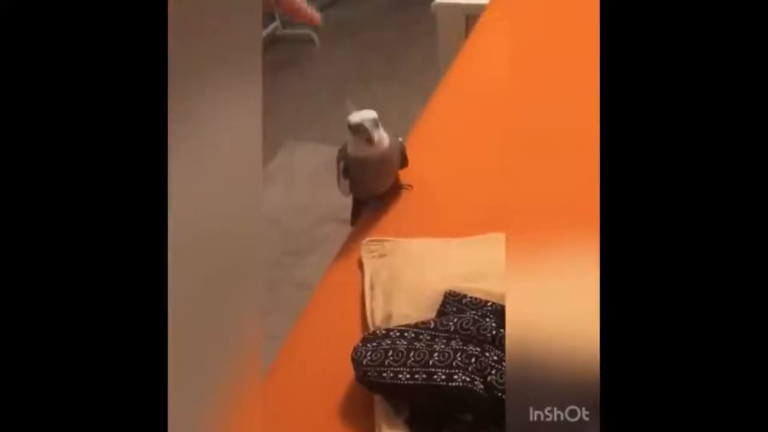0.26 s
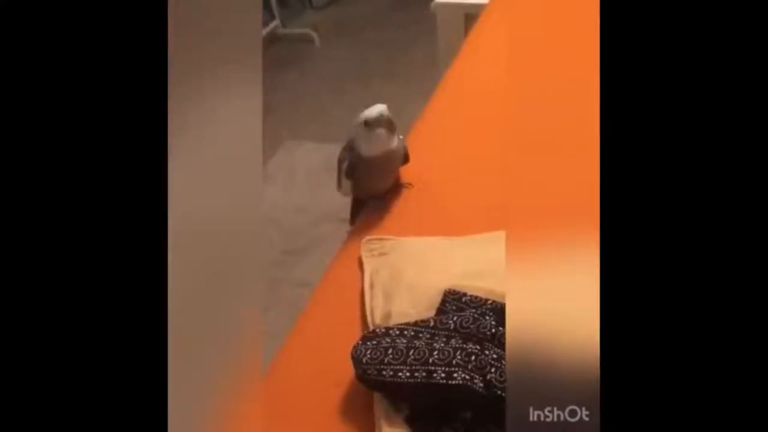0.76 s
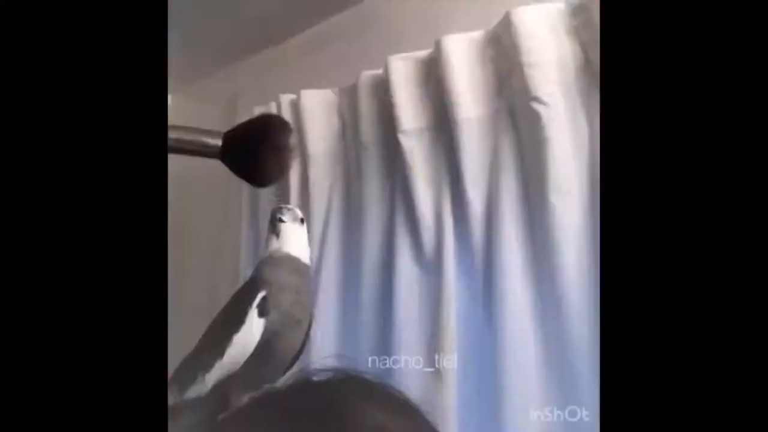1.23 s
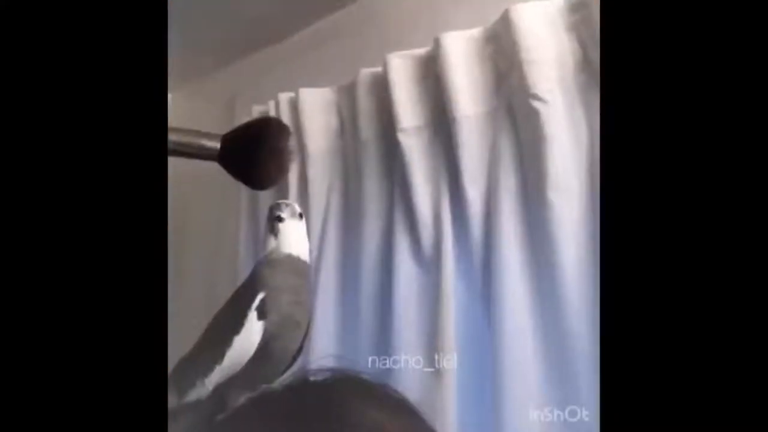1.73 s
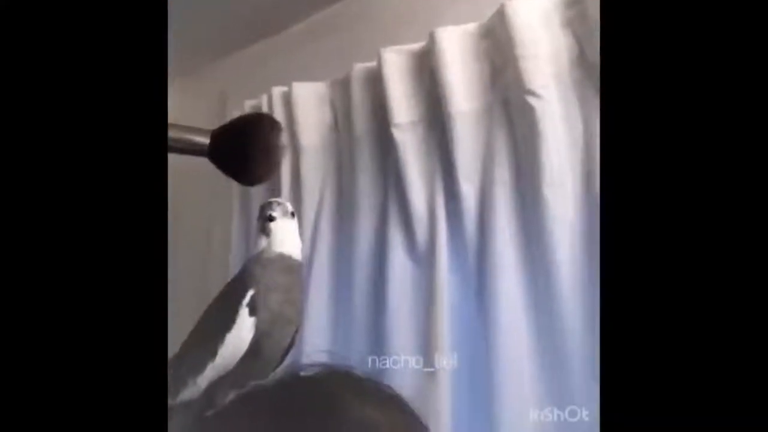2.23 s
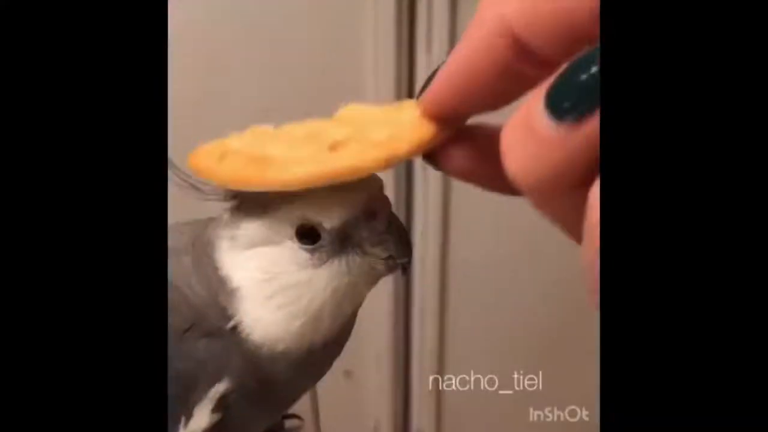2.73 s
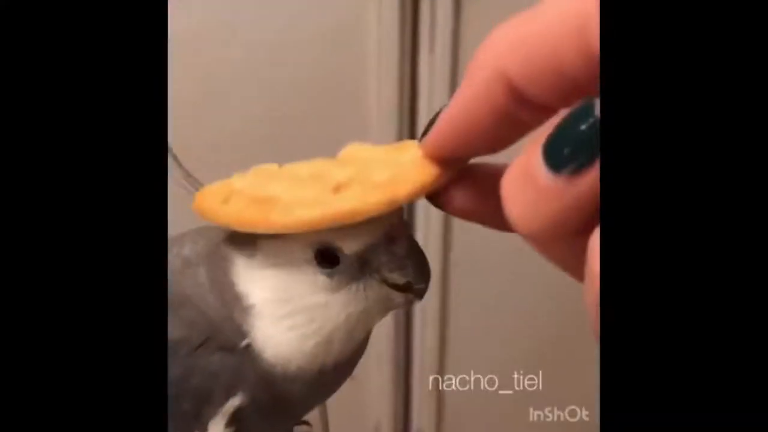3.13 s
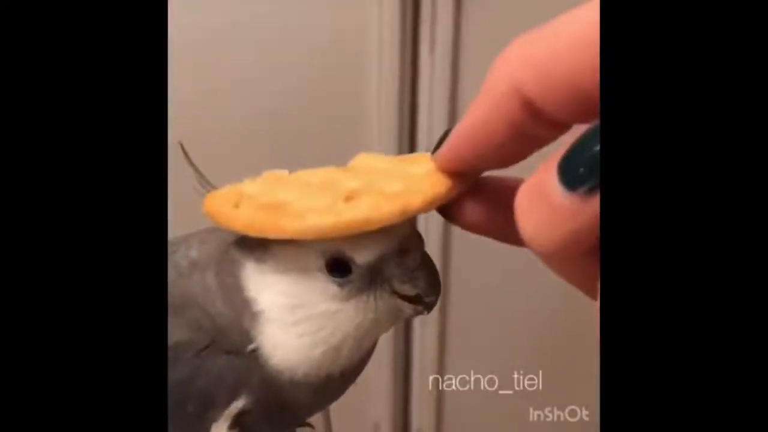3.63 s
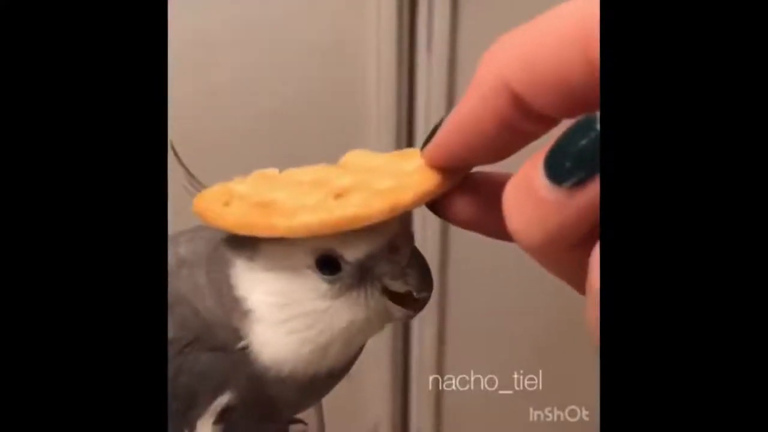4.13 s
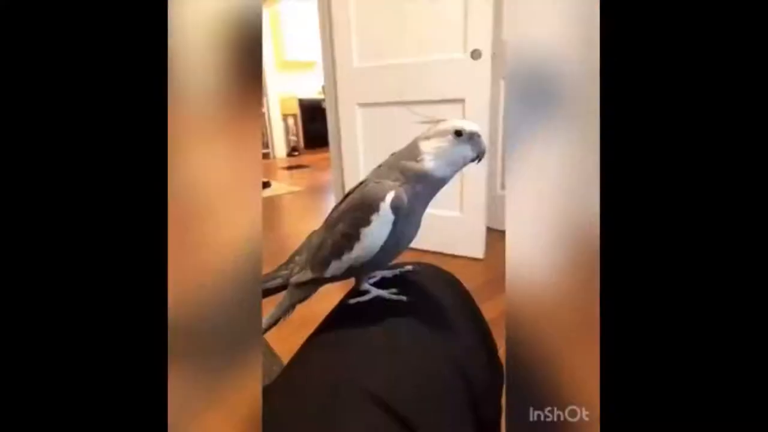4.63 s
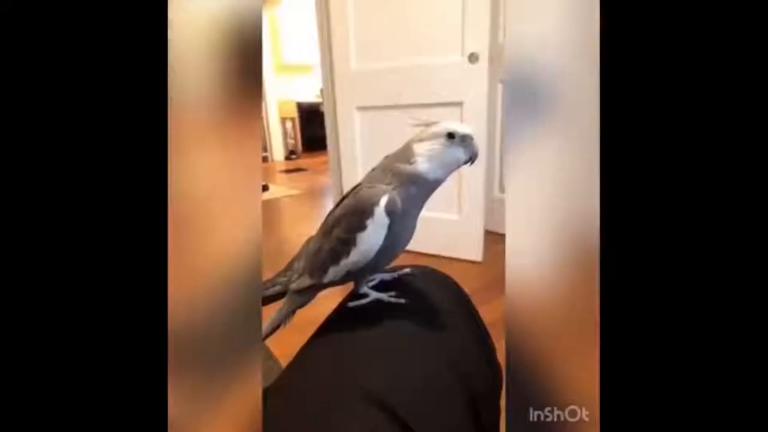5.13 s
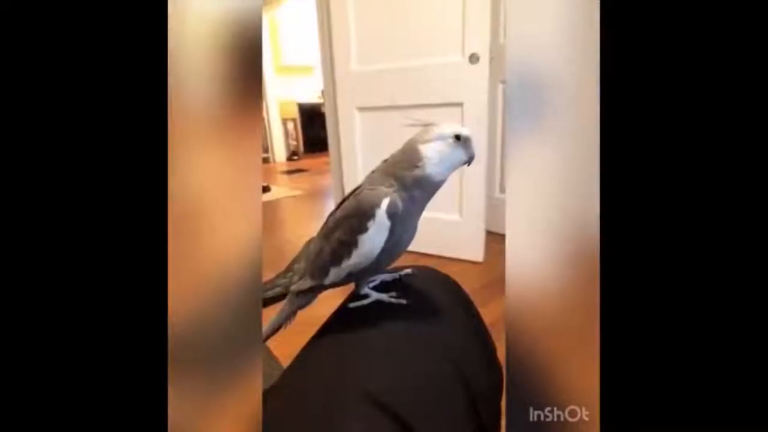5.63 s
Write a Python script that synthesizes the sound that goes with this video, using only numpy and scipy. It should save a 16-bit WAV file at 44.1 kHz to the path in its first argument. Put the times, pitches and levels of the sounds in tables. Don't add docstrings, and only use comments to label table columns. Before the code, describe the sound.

Three shrill fast-warbling cockatiel calls over changing room hum, with abrupt cuts between, ending in near-silence with soft far-off rubs and knocks.

```python
import sys
import numpy as np
from scipy import signal
from scipy.fft import rfft, irfft, next_fast_len
from scipy.io import wavfile
from scipy.ndimage import uniform_filter1d, minimum_filter1d, map_coordinates

SR = 44100
rng = np.random.default_rng(int(sys.argv[2]) if len(sys.argv) > 2 else 0)


def makeup_ratio(level_db):
    decades = np.asarray(level_db, float) / 20
    return 10 ** decades


def generate_wav(signal):
    frames = np.transpose(np.atleast_2d(signal))
    scaled = np.clip(frames, -1, 1) * 32767
    pcm = np.round(scaled).astype(np.int16)
    wavfile.write(sys.argv[1], SR, pcm)


N = 258867

# (time [s], sag pitch [Hz], next crest pitch [Hz], crest level [dB],
# beak opening [dB], hoarseness [dB])
FIRST_CALL = [
    (-0.026, 1870, 2050, -19, 10, -45),
    (0.01, 1792, 2083, -17, -2, -44),
    (0.082, 1803, 2070, -17.5, -2.5, -40.5),
    (0.197, 1755, 2049, -16.5, -2, -39),
    (0.311, 1774, 2040, -19, 4.5, -48.5),
    (0.466, 1748, 1995, -20.5, 1, -47),
    (0.659, 1744, 2012, -19, 1, -40),
    (0.696, 1732, 1917, -20, 1.5, -36),
    (0.724, 1782, 1637, -33, 6.5, -14),
]
SECOND_CALL = [
    (1.495, 1305, 1264, -32, -12.5, -27.5),
    (1.519, 1334, 1640, -20, -26, -21.5),
    (1.549, 1537, 1886, -12.5, -5.5, -20.5),
    (1.652, 1799, 2115, -11, -0.5, -48.5),
    (2.071, 1901, 2168, -12, 7.5, -64),
    (2.144, 1920, 2166, -13.5, 7.5, -60.5),
    (2.221, 1890, 2083, -11, 2, -50),
    (2.253, 1880, 1887, -11, 1, -39),
    (2.292, 1780, 1868, -24.5, -3, -16.5),
]
THIRD_CALL = [
    (2.854, 1221, 1527, -15.5, -30, -25.5),
    (2.917, 1626, 1962, -7.5, -7.5, -26.5),
    (2.986, 1818, 2109, -8, 0, -25.5),
    (3.124, 1875, 2140, -6, 1.5, -55.5),
    (3.594, 1886, 2165, -8, 2.5, -52.5),
    (4.014, 1821, 2115, -9.5, 3, -44.5),
    (4.056, 1802, 2054, -11, 1.1, -44),
    (4.098, 1790, 1859, -11.5, 0.5, -34.5),
    (4.137, 1531, 1525, -21, 1, -15.5),
]
THROBS_PASSED = [
    [0, 1, 3, 6, 9, 13, 18, 19, 20],
    [0, 1, 3, 6, 18, 20, 22, 23, 24],
    [0, 2, 4, 8, 21, 32, 33, 34, 35],
]
# (time [s], pitch [Hz], level [dB])
CALL_ENDS = [
    (.749, 1500, -47),
    (2.32, 1740, -58),
    (4.156, 1370, -25),
]
# (time [s], hoarseness [dB])
CRACKS = [(.272, -35.5), (.311, -38), (.428, -37), (.619, -32), (.658, -38.5), (1.617, -30.5),
          (1.652, -35.5), (1.69, -38.5), (1.76, -42), (1.896, -34), (1.934, -39), (2.07, -31.5),
          (2.108, -44), (2.143, -30), (3.02, -22.5), (3.338, -31), (3.484, -32), (3.592, -34.5),
          (4.058, -31.5)]


def throbs(k):
    points = (FIRST_CALL, SECOND_CALL, THIRD_CALL)[k]
    passed = THROBS_PASSED[k]
    count = np.arange(passed[-1] + 1)
    rows = np.array([np.interp(count, passed, column) for column in np.transpose(points)]).T
    scatter_hz, scatter_db, end_hoarse_db = 16, 0.06, -20
    scatter = [0, scatter_hz, scatter_hz, scatter_db, scatter_db, 0]
    rows = rows + rng.standard_normal(rows.shape) * scatter
    for s, hoarse_db in CRACKS:
        rows[np.abs(rows[:, 0] - s) < .012, 5] = hoarse_db
    s, hz, db = CALL_ENDS[k]
    return np.vstack([rows, [s, hz, hz, db, rows[-1, 4], end_hoarse_db]])


# (frequency [Hz], level [dB])
BEAKS = [
    [(1300, -16), (2050, -4.5), (3000, -10), (4100, -2), (5300, -9.5), (6200, -8), (7600, -24.5),
     (8200, -12.5), (10300, -31), (12300, -12.5), (14000, -29)],
    [(1300, -2.5), (2100, -11), (2700, -10.5), (4200, -5.5), (5300, -4.5), (6400, -13.5), (7900, -21.5),
     (8500, -19.5), (10500, -32), (12600, -18), (14000, -31)],
    [(1300, -7.5), (2100, -5.5), (2700, -9), (4200, -5.5), (5300, -3), (6400, -3), (8500, -10.5),
     (10600, -21), (12700, -10), (14000, -22)],
]
TRILLS = [(1.6, 0.94), (1.75, 0.94), (1.15, 1.048)]
# (strength [dB], fading in a full sag [dB])
OVERTONES = [(0.5, 8.5), (-0.5, 21.5), (1.5, 16), (0.5, 15), (-1.5, 32), (-3, 28), (-2.5, 31), (-7.5, 32),
             (-16.5, 31.5)]


def call(k):
    s, low, crest, db, opening, hoarse_db = np.transpose(throbs(k))
    beak = BEAKS[k]
    narrow, fading = TRILLS[k]
    t = np.arange(N) / SR
    place = np.interp(t, s, np.arange(len(s)))
    row = np.minimum(place.astype(int), len(s) - 2)
    climb = np.clip((low[row + 1] - low[row]) / 200, 0, 1)
    late = .88 + .12 * climb
    arch = np.abs(np.sin(np.pi * np.clip(place - row, 0, 1) ** late))
    middle = np.append((s[1:] + s[:-1]) / 2, s[-1])

    depth = (crest + np.append(crest[0], crest[:-1])) / 2 - low
    fullness = np.clip(np.interp(t, s, depth) / 270 + 0.69 * climb, .1, 1.4)
    dropout = 0.52 / (1 + np.exp((arch - .56) / 0.065))
    sag = fullness * (0.32 * (1 - arch) + dropout)
    hoarse = makeup_ratio(np.clip(np.interp(t, s, hoarse_db), -66, -16)) * (1 - arch) ** 1.1

    rise = crest[row] - (low[row] + low[row + 1]) / 2
    jitter = 1 + 0.0012 * wobble(150) + 0.14 * np.sqrt(hoarse) * wobble(600)
    pitch = (np.interp(t, s, low) + rise * arch ** narrow) * jitter
    turn = 2 * np.pi * np.cumsum(pitch) / SR
    half_pitch = 0.41 * np.cos(turn / 2) + np.cos(3 * turn / 2)
    voice = makeup_ratio(1.5) * hoarse * half_pitch

    effort_db = np.interp(t, middle, db)
    thin_db = 0.41 * (effort_db - db.max()) * (t < s.mean())
    for n, (strength_db, fade_db) in enumerate(OVERTONES, start=1):
        colour = along(beak, n * pitch) + strength_db - fade_db * fading * sag
        colour += (n - 1) ** 0.41 * thin_db
        if n in (3, 5, 7):
            colour += np.interp(t, middle, opening)
        lag = .2 * (n - 3) ** 2
        level = makeup_ratio(colour + (1.0 + 0.26 * n) * wobble(70))
        voice += level * np.cos(n * turn - lag) * (n * pitch < 14500)

    air = breath(beak)
    voice += makeup_ratio(2.0) * hoarse * air
    gate = np.clip(np.minimum(t - s[0], s[-1] - t) / 0.0034, 0, 1)
    rasp = makeup_ratio(rasp_level(k, s[-1]) + 3.6 * wobble(250)) * air
    rasp *= (t > s[0]) * (t < s[-1] + .06)
    return np.sqrt(2) * makeup_ratio(effort_db) * gate * voice + rasp


def breath(beak):
    def throat(hz):
        return makeup_ratio(along(beak, hz) * 0.47) / (1 + (1100 / (hz + 1)) ** 4) / (1 + (hz / 9800) ** 6)
    return unit(filtered(rng.standard_normal(N), throat))


RASP_DB = [-49, -65, -40.5]
# (time [s], peak [dB], rise [dB/s], fall [dB/s])
FLARES = [
    (0.741, -34, 279.5, 798),
    (1.65, -40.5, 71.5, 401.5),
    (2.282, -28, 902.5, 765),
    (2.92, -21.5, 356.5, 251),
    (4.142, -18.5, 423, 944),
]


def rasp_level(k, end_s):
    t = np.arange(N) / SR
    levels = [np.where(t < end_s, RASP_DB[k], -120)]
    for s, db, rise, fall in FLARES:
        levels.append(db - np.where(t < s, rise * (s - t), fall * (t - s)))
    return np.max(levels, axis=0)


# (level [dB], near walls [dB], t60 at 2 kHz [s], t60 at 10 kHz [s])
ROOMS = [(-9, 8.5, 0.41, 0.31), (-6, 14.5, 0.29, .25), (-19.5, 1, 0.69, 0.18)]


def room(x, k):
    db, near_db, low_t60, high_t60 = ROOMS[k]
    hz, t, z = signal.stft(rng.standard_normal(SR // 2), SR, nperseg=256)
    t60 = along([(2000, low_t60), (10000, high_t60)], hz)[:, None]
    decay = makeup_ratio(-60 * t / t60) + makeup_ratio(near_db - 60 * t / 0.06)
    tail = signal.istft(z * decay, SR, nperseg=256)[1]
    answer = signal.fftconvolve(np.pad(x, (180, 0)), tail / np.linalg.norm(tail))[:N]
    return x + makeup_ratio(db) * answer


# (time [s], length [s], level at first [dB], level at last [dB])
SCUFFS = [
    (4.419, .01, -66, -76),
    (4.525, .008, -76, -74),
    (4.575, .18, -66.5, -71),
    (4.795, 0.18, -68.5, -68.5),
    (4.988, .062, -78, -67),
    (5.387, 0.16, -73.5, -75),
    (5.674, 0.16, -60.5, -74.5),
    (5.84, .04, -71, -75),
]


def scuff_level():
    t = np.arange(N) / SR
    still_db, edge_db_per_s = -84, 900
    levels = [np.full(N, still_db)]
    for s, length, first, last in SCUFFS:
        outside = np.maximum(0, np.maximum(s - t, t - s - length))
        levels.append(np.interp(t, [s, s + length], [first, last]) - edge_db_per_s * outside)
    return np.max(levels, axis=0)


# (frequency [Hz], width [Hz], level [dB])
FURNITURE = [(772.7, 49, -10.5), (1247, 35, -5), (1955, 210, -20.5), (2310, 44, -16), (3180, 420, -25.5),
             (4500, 160, -20), (6526, 1600, -29.5)]


def scuffs():
    def wood(f):
        ring = 0
        for k, (c, w, db) in enumerate(FURNITURE):
            ring = ring + (-1) ** k * makeup_ratio(db) * 1j * f * w / (c * c - f * f + 1j * f * w)
        return ring
    rub = rng.standard_normal(N) * makeup_ratio(1.58 * wobble(50))
    return makeup_ratio(scuff_level() + 2.0) * unit(filtered(rub, wood))


# (frequency [Hz], density [dB per Hz])
HUMS = [
    [(15, -23), (25, -5.5), (48, 0), (82, -8), (168, 0.5), (286, -9), (326, -6), (372, -10), (584, -10),
     (868, -21), (1400, -24.5), (14000, -52)],
    [(15, -35.5), (25, -21.5), (91, -0.5), (187, -14.5), (271, -5), (344, -17.5), (868, -24), (1230, -30.5),
     (1600, -33.5), (2030, -43.5), (2710, -35), (14000, -64.5)],
    [(15, -54), (25, -27), (48, -6.5), (87, -10.5), (129, -4), (187, -9.5), (225, 2.5), (264, -4),
     (569, -12.5), (684, -11.5), (916, -3.5), (1100, -11), (1260, -6.5), (1600, -17), (14000, -52)],
    [(15, -67), (25, -35), (65, -15), (96, -5), (173, -12), (244, 0), (392, -19.5), (485, -15.5),
     (554, -27), (722, -29.5), (1070, -36), (2500, -42.5), (4480, -46), (4990, -46), (14000, -55)],
]
# (start [dB], middle [dB], end [dB], swell after opening cut [dB], before closing cut [dB])
HUM_DB = [(-51.5, -51, -49.5, 7, 2.5), (-54, -57, -55, 0.5, 2), (-35.5, -38.5, -36, 0.89, -2),
          (-51.5, -52, -51, 0.5, 1)]


def hum(k):
    start, end = CUTS[k], CUTS[k + 1]
    start_db, middle_db, end_db, opening_db, closing_db = HUM_DB[k]
    swell_s = .035
    air = filtered(rng.standard_normal(N), lambda hz: makeup_ratio(along(HUMS[k], hz)))
    t = np.clip(np.arange(N) / SR, start, end)
    swell_db = opening_db * np.exp((start - t) / swell_s) + closing_db * np.exp((t - end) / swell_s)
    level_db = np.interp(t, [start, (start + end) / 2, end], [start_db, middle_db, end_db])
    return makeup_ratio(level_db + swell_db + 2.0 + 0.98 * wobble(4.6)) * unit(air)


CUTS = [0, 1.246, 2.562, 4.412, 5.88]


def take(k):
    t = np.arange(N) / SR
    return np.clip(np.minimum(t - CUTS[k] + (k == 0), CUTS[k + 1] - t) / 0.00078, 0, 1)


def unit(x):
    return x / np.sqrt(np.mean(x ** 2) + 1e-20)


def along(points, hz):
    f, v = np.transpose(points)
    return np.interp(np.log(hz + 1), np.log(f + 1), v)


def wobble(rate):
    return map_coordinates(rng.standard_normal(int(N * rate / SR) + 4), [np.arange(N) * rate / SR])


def filtered(x, response):
    m = next_fast_len(N + SR // 2)
    return irfft(rfft(x, m) * response(np.fft.rfftfreq(m, 1 / SR)), m)[:N]


def scene():
    sources = [room(call(k), k) for k in range(3)] + [scuffs()]
    return sum(take(k) * (sources[k] + hum(k)) for k in range(4))[None]


def masked(x):
    mask_db = [(2500, -35), (5000, -35.0), (9500, -27), (10600, -31.5), (11500, -26.5), (13000, -34.0)]
    grain_db = [(2000, -30.5), (6000, -16.5), (10000, -7.5), (14000, -6.5)]
    hz, _, z = signal.stft(x, SR, nperseg=1024)
    band = uniform_filter1d(uniform_filter1d(np.abs(z) ** 2, size=9, axis=0), size=3, axis=1)
    loudest = -minimum_filter1d(-band, size=81, axis=0)
    grain = signal.stft(rng.standard_normal(N), SR, nperseg=1024)[2]
    grain = grain / np.abs(grain).mean()
    floor = np.sqrt(np.abs(minimum_filter1d(band, size=3, axis=1)))
    z = z + makeup_ratio(along(grain_db, hz))[:, None] * floor * grain
    kept = (band > loudest * makeup_ratio(2 * along(mask_db, hz))[:, None]) | (hz[:, None] < 1400)
    return signal.istft(z * kept, SR, nperseg=1024)[1][:N]


def low_pass(x):
    return signal.sosfilt(signal.butter(12, 14480, fs=SR, output="sos"), x)


def record(dry):
    top, hard, ceiling = 1.03, 4, .995
    x = dry[0] / (1 + np.abs(dry[0] / top) ** hard) ** (1 / hard)
    x = masked(x)
    x = filtered(x, lambda hz: np.clip((14200 - hz) / 600, 0, 1))
    needed = ceiling / np.maximum(np.abs(x), ceiling)
    x = x * uniform_filter1d(minimum_filter1d(needed, size=128), size=128)
    return low_pass(x[None])


dry = scene()
out = record(dry)
generate_wav(out)
```